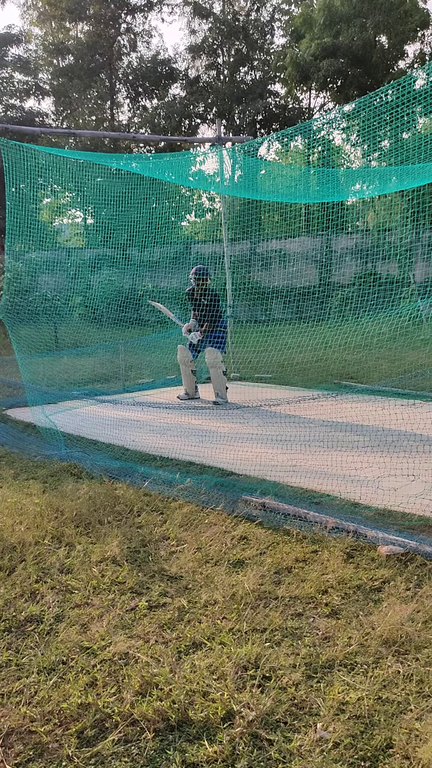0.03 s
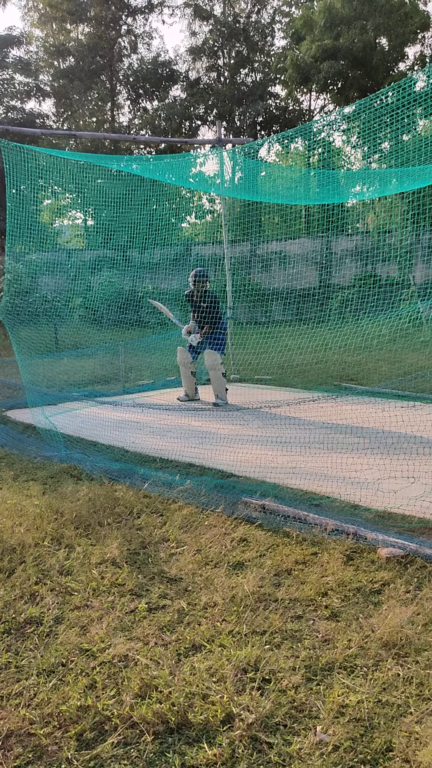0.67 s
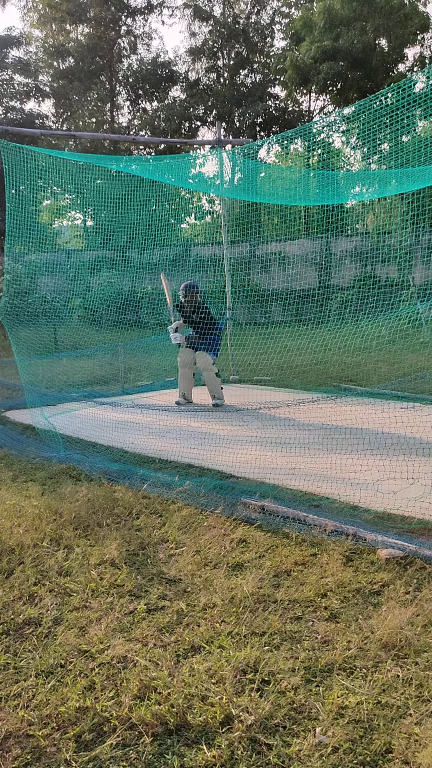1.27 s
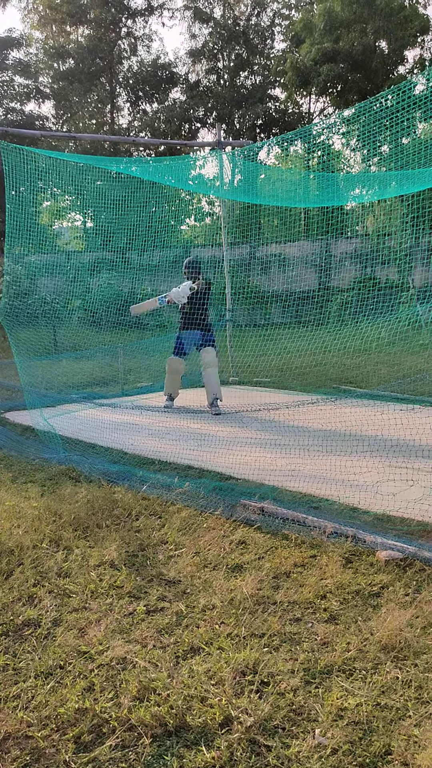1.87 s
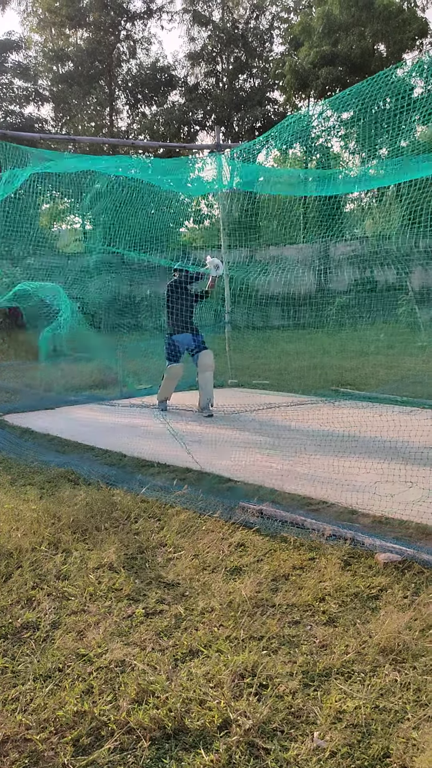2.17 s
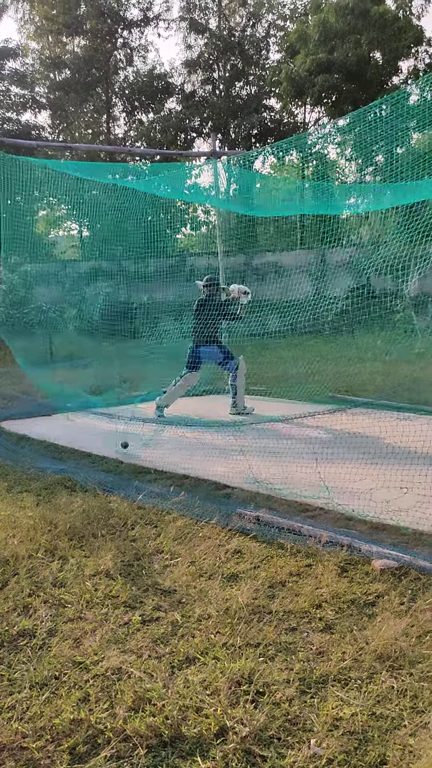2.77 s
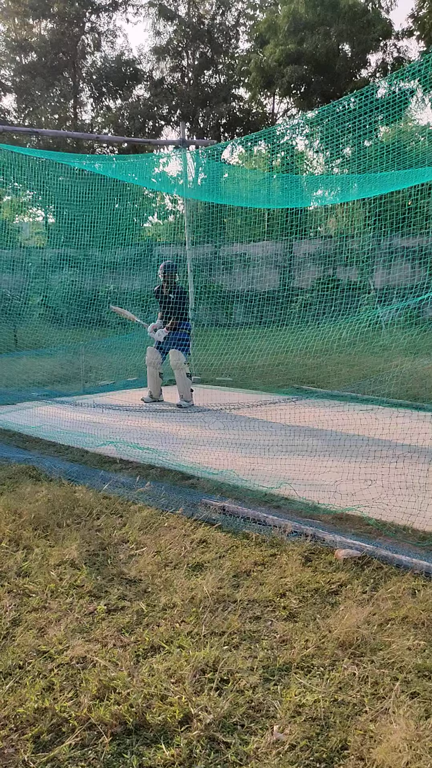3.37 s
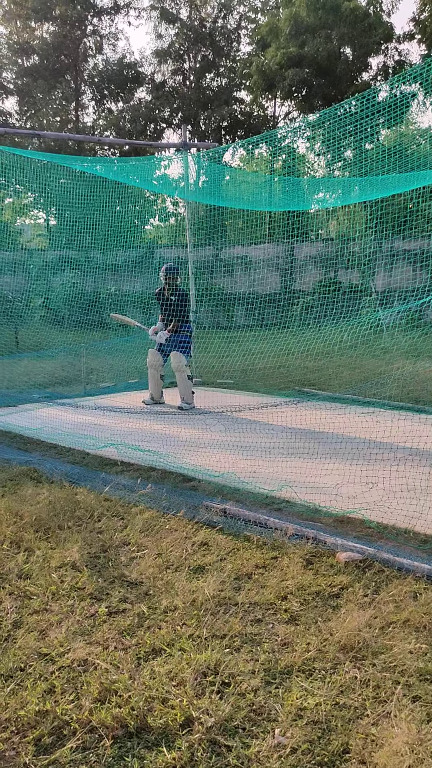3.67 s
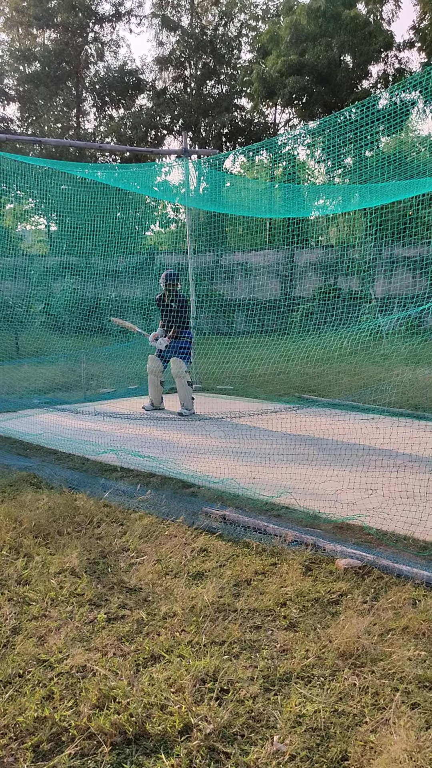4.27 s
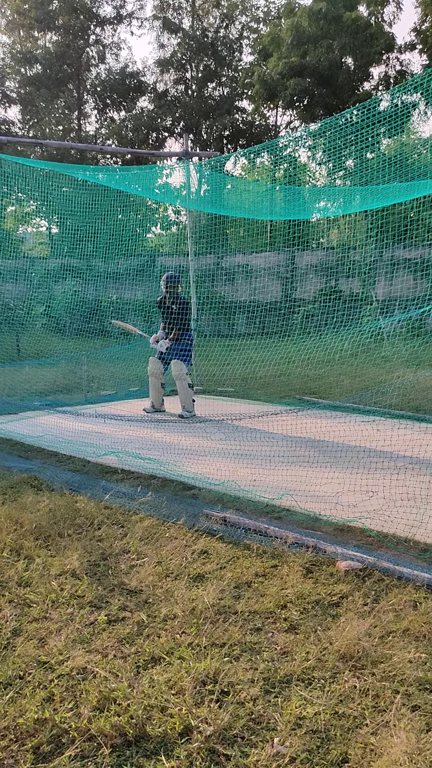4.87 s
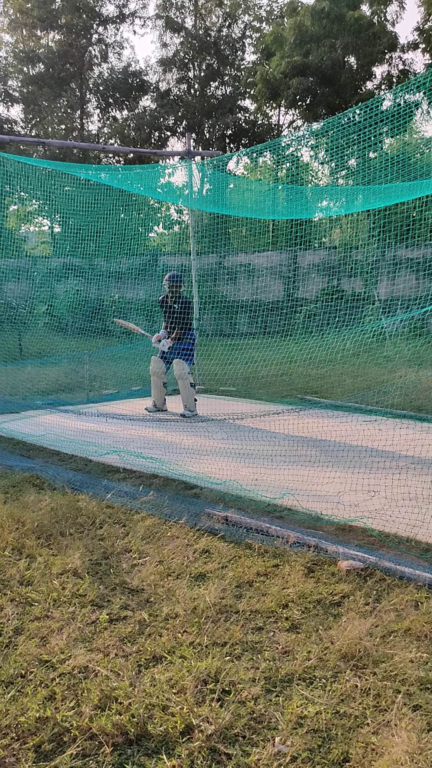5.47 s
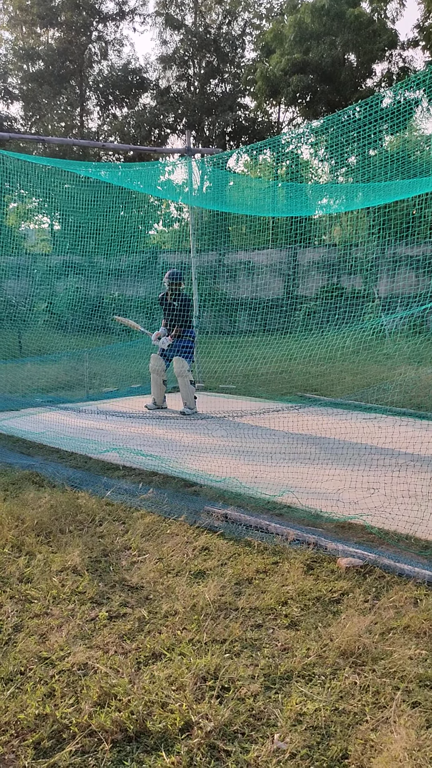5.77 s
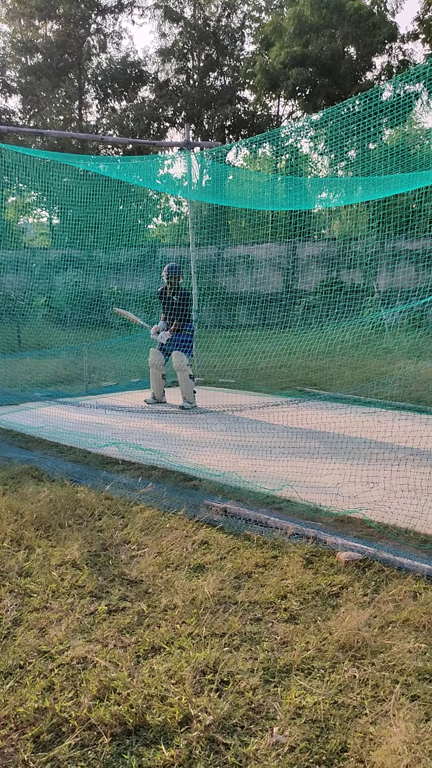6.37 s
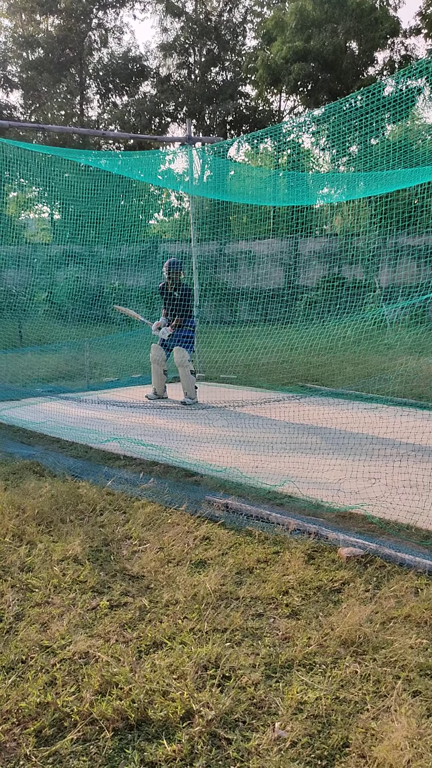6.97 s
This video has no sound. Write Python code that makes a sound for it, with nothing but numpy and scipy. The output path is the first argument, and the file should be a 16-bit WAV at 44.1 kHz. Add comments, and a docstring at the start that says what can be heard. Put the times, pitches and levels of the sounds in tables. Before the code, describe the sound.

At an outdoor practice net, shoes tap and scuff lightly and a ball bounces with a knock. A cricket bat strikes it with one sharp crack and a brief echo. The ball slaps the netting, which rustles, and a few soft thuds follow. The rest is quiet: a faint high insect buzz, a distant vehicle humming past and a few thin bird chirps, heard in stereo.

```python
"""A cricket bat meets the ball in an outdoor practice net: the impact excites damped modes, one sharp crack.
Walls and trees return it as echoes and diffuse reverberation. Shoes scuff by friction, the ball pitches,
then slaps the net, shakes its cords and drops with soft thuds.
Behind it, in calm air, a bush cricket buzzes by stridulation, a small bird chirps, a faint whistle
sounds and a distant vehicle drives by, humming at harmonics of its firing rate."""
import sys
import numpy as np
from scipy import signal
from scipy.fft import rfft, irfft, next_fast_len
from scipy.io import wavfile

SR = 44100
rng = np.random.default_rng(int(sys.argv[2]) if len(sys.argv) > 2 else 0)


def transcribe(u):
    """Save the signal u as a 16-bit wav file named by the first command-line argument.

    u: samples, shape (n,) or (channels, n), limited to [-1, 1]; the rate is SR.
    q: integer samples, one column per channel.
    """
    v = np.clip(np.atleast_2d(u).T, -1, 1)
    q = np.round(v * 32767).astype(np.int16)
    wavfile.write(sys.argv[1], SR, q)


N = 309582
T = np.arange(N) / SR
HZ = np.fft.rfftfreq(N, 1 / SR)
MS = 1e-3
EDGE_HZ = 7740
CRACK_S = 1.52429
ROAD_IN_S, ROAD_RISE_S = 2.76, 0.072


def amp(db):
    """Amplitude ratio of a level in decibels."""
    return 10 ** (np.asarray(db) / 20)


def unit(x):
    """Normalisation to rms 1."""
    return x / np.sqrt(np.mean(x ** 2) + 1e-20)


def read(points, hz):
    """Interpolation on a log-frequency axis."""
    f, value = np.transpose(points)
    return np.interp(np.log(hz + 1), np.log(f + 1), value)


def add(mix, s, sound):
    """Superposition: a sound joins the mix at time s."""
    part = mix[:, max(round(s * SR), 0):][:, :sound.shape[-1]]
    part += sound[..., :part.shape[1]]


def pan(lean_db):
    """Left and right gains for a level difference between the channels."""
    return amp([[lean_db / 2], [-lean_db / 2]])


def ramp(start_s, length_s):
    """Linear transition from 0 to 1."""
    return np.clip((T - start_s) / length_s, 0, 1)


def passing(nearest_s, span_s):
    """Spherical spreading: a source on a straight path is heard as one over distance."""
    return 1 / np.hypot(1, (T - nearest_s) / span_s)


def wander(rate_hz):
    """Random modulation: straight lines between Gaussian values."""
    knots = rng.standard_normal(8192)
    return np.interp(T * rate_hz * 2, np.arange(len(knots)), knots)


def band(hz, width_hz):
    """Narrow-band noise: a carrier with random amplitude and phase."""
    envelope = wander(width_hz) + 1j * wander(width_hz)
    carrier = np.exp(2j * np.pi * np.cumsum(hz * np.ones(N)) / SR)
    return unit((envelope * carrier).real)


# likeness of the two channels: (frequency [Hz], correlation [-1 to 1])
CORRELATION = [(60, 0.99), (120, 0.99), (250, 0.98), (500, 0.84), (1000, 0.65), (2020, 0.26), (4090, 0.02),
               (8270, -0.14)]
# imbalance at lean = 1: (frequency [Hz], left minus right [dB])
IMBALANCE = [(60, 0.5), (100, 1.0), (180, 1.5), (310, 1.0), (540, -0.5), (930, 2.5), (1600, 4.0),
             (2770, 4.5), (4780, 8.0), (8270, 2.5)]
def noise(spectrum, lean=0):
    """Partly coherent noise: the channels are alike in the bass and unrelated in the treble."""
    a, b = rfft(rng.standard_normal((2, N)))
    same = read(CORRELATION, HZ)
    channels = np.array([a, same * a + np.sqrt(1 - same ** 2) * b])
    balance = amp(lean * read(IMBALANCE, HZ) * np.array([[.5], [-.5]]))
    return unit(irfft(channels * balance * amp(read(spectrum, HZ)), N))


def hiss(size, centre_hz, octaves):
    """Random-phase stereo noise under a Gaussian hump in log frequency."""
    hz = np.fft.rfftfreq(size, 1 / SR)
    a, b = np.exp(2j * np.pi * rng.random((2, len(hz))))
    same = read(CORRELATION, hz)
    channels = np.array([a, same * a + np.sqrt(1 - same ** 2) * b])
    hump = np.exp(-.5 * (np.log2((hz + 1) / centre_hz) / octaves) ** 2) * (hz < EDGE_HZ)
    return unit(irfft(channels * hump, size))


def tick(centre_hz, decay_ms, octaves):
    """Noise transient with a fast attack and exponential decay."""
    t = T[:2048]
    return hiss(len(t), centre_hz, octaves) * np.exp(-t / (decay_ms * MS)) * (1 - np.exp(-t / 0.00034))


def ring(hz, rise_ms):
    """Heavily damped mode: it swells during contact, peaks at rise_ms and dies quickly."""
    t = T[:2048]
    u = t / (rise_ms * MS)
    return -u ** 2 * np.exp(2 - 2 * u) * np.sin(2 * np.pi * hz * t)


# outdoor background: (frequency [Hz], relative spectral density [dB])
AIR_SPECTRUM = [(13, -23.5), (25, 0), (80, -2.5), (160, -4.5), (260, -17), (430, -25), (560, -24.5),
                (680, -21), (870, -23), (1900, -24.5), (4200, -33), (5300, -28.5), (7050, -13.5),
                (7700, -21.5)]
def calm_air():
    """Ambient noise whose level drifts slightly."""
    return amp(-57.5 + 0.76 * wander(2.7)) * noise(AIR_SPECTRUM, lean=0.49)


def far_whistle(start_s=.2, end_s=.75):
    """Narrow-band noise, heard as a faint, thin whistle."""
    u = ramp(start_s, end_s - start_s)
    arch = 2 * np.sqrt(u * (1 - u))
    return amp(-83) * band(3400, width_hz=43) * arch


# traffic noise: (frequency [Hz], relative spectral density [dB])
ROAD_SPECTRUM = [(13, -19.5), (30, -1.5), (60, -5), (130, -16.5), (215, -14.5), (330, -20.5), (1050, -18.5),
                 (1450, -18.5), (1820, -18), (2700, -21), (4500, -25.5), (6100, -13.5), (7100, -15.5),
                 (7700, -22.5)]
def road():
    """Incoherent sources add in power: far traffic and one passing vehicle, towards the left."""
    roar = noise(ROAD_SPECTRUM, lean=.9)
    level = np.hypot(amp(-69), amp(-56) * passing(nearest_s=5.73, span_s=1))
    return ramp(ROAD_IN_S, ROAD_RISE_S) * level * amp(.5 * wander(6.1)) * roar


# engine speed, steady, stumbling, then slowing: (time [s], firing rate [Hz])
FIRING_RATE = [(5.4, 33.7), (5.62, 30.7), (5.8, 32.38), (7.02, 26.3)]
# harmonics, relative to the engine gain: (order [-], cruising [dB], pulling [dB], slowing [dB])
ENGINE_HARMONICS = [(1, -13.5, -11, -6), (2, -6, -14, -11), (3, -25, -20, -9), (4, -23, -16, -3),
                    (5, -3, -1, -4.5), (6, -3, -11, -11)]
# swell of the hum: (time [s], gain [dB])
ENGINE_GAIN = [(2.85, -67.5), (3.6, -61.5), (4.15, -63.5), (4.45, -58), (4.9, -59), (5.25, -62.5),
               (5.7, -59.5), (6.1, -62.5), (7.02, -63.5)]
def engine(pull_s=4.24, slow_s=5.3, change_s=0.16, gear_order=36.2):
    """Periodic firing gives harmonics that shift with load; the gears sing at a multiple of its rate."""
    firing_hz = np.interp(T, *np.transpose(FIRING_RATE))
    pull, slow = ramp(pull_s, change_s), ramp(slow_s, change_s)
    unsteady = 0.0036 * wander(5.0) + 0.014 * slow * wander(14)
    phase = 2 * np.pi * np.cumsum(firing_hz * (1 + unsteady)) / SR
    hum = np.zeros(N)
    for order, cruise_db, pull_db, slow_db in ENGINE_HARMONICS:
        order_db = cruise_db + (pull_db - cruise_db) * pull + (slow_db - pull_db) * slow
        hum += np.sqrt(2) * amp(order_db + 1.9 * wander(5.3)) * np.sin(order * phase)
    hum *= amp(np.interp(T, *np.transpose(ENGINE_GAIN)))
    gears = amp(-73.5) * passing(nearest_s=4.53, span_s=1.4) * band(gear_order * firing_hz, width_hz=90)
    return ramp(ROAD_IN_S, ROAD_RISE_S) * (hum + gears) * pan(1.4)


# far-off whine from the road: (frequency [Hz], level [dB])
WHINE_LINES = [(2891, -87.5), (3257, -78), (3639, -78)]
def road_whine():
    """Spectral lines broadened by random modulation: a thin, ragged whine at the end."""
    return sum(amp(db) * band(hz, width_hz=60) for hz, db in WHINE_LINES) * ramp(6.43, 0.028)


# bird calls: (time [s], duration [s], middle pitch [Hz], glide [Hz], level [dB])
BIRD_CHIRPS = [(5.364, 0.11, 4470, -200, -73), (5.622, 0.088, 4460, 150, -70), (5.815, .10, 4220, -40, -74),
               (6.305, 0.096, 4350, -300, -71), (6.719, 0.127, 4330, 60, -70)]
def bird(arch_hz=170):
    """Frequency modulation: thin whistles arch and glide in pitch, blurred by distance."""
    out, waver, flutter = np.zeros((2, N)), wander(80), amp(2.3 * wander(57))
    for s, length, middle_hz, glide_hz, db in BIRD_CHIRPS:
        u = np.linspace(-1, 1, round(length * SR))
        span = slice(round(s * SR), round(s * SR) + len(u))
        hz = (middle_hz + glide_hz * u / 2 - arch_hz * u ** 2) * (1 + .014 * waver[span])
        envelope = amp(db) * flutter[span] * np.sqrt(1 - u ** 2)
        add(out, s, envelope * np.sin(2 * np.pi * np.cumsum(hz) / SR))
    return out


# phrases that swell to a sudden stop: (start [s], stop [s], final gain [dB])
INSECT_PHRASES = [(0, 0.99, -63.5), (1.844, 2.542, -63), (2.812, 3.109, -60.5), (3.6, 4.491, -60),
                  (5.138, 5.884, -60), (6.645, 7.203, -61.5)]
def bush_cricket(tooth_hz=6950, fall_hz_per_s=110000, swell_db=28):
    """Stridulation: each wing stroke is a short falling note; the strokes slow before each stop."""
    level, stroke_hz = np.zeros(N), np.full(N, 140.5)
    for start, stop, last_db in INSECT_PHRASES:
        on = (T >= start) & (T < stop)
        level[on] = amp(last_db - swell_db * (stop - T[on]) ** 1.87)
        stroke_hz[on] -= 8 * np.exp((T[on] - stop) / 0.16)
    cycle = np.cumsum(stroke_hz) / SR % 1
    from_middle_s = (cycle - .5) / stroke_hz
    phase = 2 * np.pi * (tooth_hz - fall_hz_per_s * from_middle_s / 2) * from_middle_s
    note = np.cos(phase + .7 * wander(45))
    strokes = unit(note * np.sin(np.pi * cycle) ** 2 * amp(wander(60)))
    # foliage smears part of the song into a steady rasp
    rasp = noise([(5000, -42.5), (6400, -19), (6750, -10), (6950, -11.5), (7150, 0.5), (7500, -7),
                  (8000, -36)])
    return level * (.85 * strokes + .4 * rasp) * pan(-.5)


# rubbing of shoes, pads and bat: (time [s], duration [s], gain [dB], centre [Hz])
SCUFF_STROKES = [(0.528, 0.09, -65, 2200), (0.687, 0.11, -62, 1800), (0.825, 0.16, -66.5, 3480),
                 (1.04, 0.03, -59.5, 2800), (1.079, 0.23, -63, 2370), (1.124, 0.042, -48, 4240),
                 (1.251, 0.25, -56, 3218), (1.343, 0.096, -47, 3500), (1.468, 0.082, -52.5, 4830),
                 (2.714, 0.072, -61.5, 5100)]
# colour of the rubbing: (frequency [Hz], bandwidth [Hz], lift [dB])
SCUFF_RESONANCES = [(1700, 350, 5), (2520, 250, 8), (3350, 250, 4), (4040, 350, 6), (6080, 300, 5),
                    (7190, 300, 5)]
def scuffs():
    """Friction noise: lightly grained hiss swells and fades, filtered by a few resonances."""
    out, grain = np.zeros((2, N)), amp(1.6 * wander(200))
    for s, length, db, centre_hz in SCUFF_STROKES:
        stroke = hiss(32768, centre_hz, octaves=1.15)[:, :round(length * SR)]
        add(out, s, amp(db) * stroke * np.sin(np.linspace(0, np.pi, stroke.shape[1])))
    colour_db = sum(lift / (1 + (2 * (HZ - hz) / width) ** 2) for hz, width, lift in SCUFF_RESONANCES)
    return irfft(rfft(out * grain) * amp(colour_db - 5), N) * pan(2.5)


# shoes on the pitch: (time [s], level [dB], centre [Hz])
SHOE_TAPS = [(.5350, -50, 1300), (.5490, -47, 2200), (0.706, -45.5, 1900), (.7640, -52, 1000),
             (1.3310, -54, 1300)]
def shoe_taps():
    """Light impacts: a weak damped mode under a tick of noise."""
    out = np.zeros((2, N))
    for s, db, hz in SHOE_TAPS:
        add(out, s, amp(db) * (.55 * ring(560, .8) + tick(hz, 3, 1.1)))
    return out * pan(1.2)


# grit under a shoe: (time [s], level [dB], decay time [ms])
GRIT_CRUNCHES = [(1.126, -37.5, 0.85), (2.7262, -47.5, 6.5), (2.742, -47.5, 3.4)]
def grit():
    """Friction transients: grit crunches brightly under a turning shoe."""
    out = np.zeros((2, N))
    for s, db, decay_ms in GRIT_CRUNCHES:
        add(out, s, amp(db) * tick(8200, decay_ms, 0.85))
    return out * pan(2.1)


# feet and ball on mat and turf: (time [s], thud [dB], frequency [Hz], rise time [ms], grit [dB])
TURF_THUDS = [(0.044, -54, 420, 1.9, -61), (1.102, -45.5, 297, 1.8, -58), (1.1570, -31, 225, 1.7, -40.5),
              (1.199, -44, 180, 2.6, -54), (2.029, -43.5, 398.5, 1.9, -56), (2.4855, -47, 413, 2.16, -55.5)]
def turf_thuds():
    """Impacts on soft ground: a low damped mode and a tick of grit."""
    out = np.zeros((2, N))
    for s, thud_db, hz, rise_ms, grit_db in TURF_THUDS:
        add(out, s, amp(thud_db) * ring(hz, rise_ms) + amp(grit_db) * tick(950, 4.6, 1.1))
    return out * pan(.6)


# the ball on the ground: (time [s], thud [dB], rise time [ms], tick [dB])
BALL_BOUNCES = [(1.0801, -26.5, .7, -26), (2.3838, -39.5, 1.15, -38)]
def ball_bounces():
    """Two impacts, hard then soft: the softer contact builds more slowly."""
    out = np.zeros((2, N))
    for s, thud_db, rise_ms, tick_db in BALL_BOUNCES:
        add(out, s, amp(thud_db) * ring(444, rise_ms) + amp(tick_db) * tick(8300, 1.3, 1.86))
    return out * pan(1.5)


def net_shake(start_s=1.777, rise_s=0.024, still_s=2.04, fade_db_per_s=30, ticks_per_s=60):
    """Damped motion: the mesh rustles and settles while its cords tick as a Poisson process."""
    age = np.maximum(T - start_s, 0)
    settle = np.clip((still_s - T) / .04, 0, 1)
    shake = ramp(start_s, rise_s) * amp(-fade_db_per_s * age) * settle
    cords = (rng.random(N) < ticks_per_s / SR) * rng.uniform(.3, 1, N) * shake
    rattle = signal.oaconvolve(cords[None], tick(1900, 1.8, .7), axes=1)[:, :N]
    rustle = hiss(next_fast_len(N), 2600, octaves=2.6)[:, :N] * shake
    return (amp(-42) * rattle + amp(-59.5) * rustle) * pan(2.5)


# the ball in the net: (time [s], thud [dB], frequency [Hz], snap [dB], snap centre [Hz])
NET_SLAPS = [(1.556, -20.5, 944, -22.5, 1394), (1.7732, -33, 1910, -41.5, 3150),
             (1.807, -49, 1680, -36, 2180)]
def net_slaps(rise_cycles=0.39):
    """Impulsive loading: the ball slaps the mesh and the cords snap taut."""
    out = np.zeros((2, N))
    for s, thud_db, hz, snap_db, snap_hz in NET_SLAPS:
        thud = ring(hz, rise_cycles / hz / MS)
        add(out, s, amp(thud_db) * thud + amp(snap_db) * tick(snap_hz, 3.7, .8))
    return out * pan(4.5)


def with_tail(sound, t60=0.22):
    """Reverberation by convolution: the surroundings add a faint, decaying tail."""
    tail = hiss(16384, 1510, octaves=3.2) * amp(-60 * T[:16384] / t60)
    tail /= np.linalg.norm(tail[0])
    return sound + amp(-17.5) * signal.fftconvolve(sound, tail, axes=1)[:, :N]


# crack scattered from near and far: (frequency [Hz], relative spectral density [dB])
NEAR_SPECTRUM = [(100, -17.5), (400, -26), (800, 2.5), (1500, -10.5), (2600, -4.5), (4000, -4.5),
                 (5200, -5), (6400, 3.5), (7600, 2)]
FAR_SPECTRUM = [(100, -22.5), (480, -16), (800, 0.5), (1300, -4.5), (2500, -8.5), (4000, -18), (6500, -9.5),
                (7600, -10)]
def scatter(spectrum, db, t60, rise_s, lean_db):
    """Diffuse reflection: countless small echoes of the crack arrive in clumps and decay."""
    age = np.maximum(T - CRACK_S, 0)
    clumps_db = 2.2 * wander(90)
    build_up = 1 - np.exp(-(age / rise_s) ** 2)
    decay = amp(db - 60 * age / t60 + clumps_db)
    return noise(spectrum) * build_up * decay * pan(lean_db)


# modes of bat and ball: (frequency [Hz], rise time [ms], left level [dB], right level [dB])
BAT_MODES = [(257, 3.6, -25.7, -28.2), (742, 2.14, -40.0, -11.0), (856, 1.51, -4.9, -12.0),
             (1516, 2.36, -27.7, -27.4), (1855, 3.6, -32.1, -36.9), (2542, 1.18, -25.7, -25.9),
             (2926, 0.98, -25.7, -25.0), (4119, 2.08, -24.2, -30.9), (4877, 1.5, -21.8, -28.7),
             (5936, 1.22, -15.6, -23.9), (6515, 1.37, -15.6, -36.0), (7173, 0.35, -8.1, -4.2),
             (7494, 3.6, -32.6, -28.9)]
# echoes from pitch, walls and trees: (delay [s], gain [dB], low-pass cutoff [Hz])
REFLECTIONS = [(.0033, -17, 801.5), (0.0222, -35, 2500), (.0700, -29, 2830), (.0820, -41.5, 4000),
               (0.0876, -21, 1490), (.1210, -31, 2200), (0.1434, -26.5, 1300)]
def bat_crack(ground_dip_hz=455, right_leads_ms=.114):
    """Modal superposition: the blow rings bat and ball, and duller echoes follow."""
    modes = sum(amp([[left], [right]]) * ring(hz, rise_ms) for hz, rise_ms, left, right in BAT_MODES)
    # the reflection off the grass cancels one low band
    blow = signal.lfilter(*signal.iirnotch(ground_dip_hz, Q=3.5, fs=SR), modes)
    out = np.zeros((2, N))
    add(out, CRACK_S, blow)
    for delay, db, cutoff_hz in REFLECTIONS:
        echo = signal.lfilter(*signal.butter(1, cutoff_hz, fs=SR), blow)
        add(out, CRACK_S + delay, amp(db) * echo)
    out[1] = np.roll(out[1], -round(right_leads_ms * MS * SR))
    return out


def scene():
    """Superposition of the stroke, the movement around it and the background."""
    near = scatter(NEAR_SPECTRUM, db=-26.5, t60=0.48, rise_s=.009, lean_db=3.5)
    far = scatter(FAR_SPECTRUM, db=-42.5, t60=1.4, rise_s=0.044, lean_db=2.0)
    knocks = ball_bounces() + turf_thuds() + shoe_taps() + net_slaps() + grit()
    movement = with_tail(knocks) + net_shake() + scuffs()
    background = calm_air() + road() + engine() + road_whine() + bush_cricket() + bird() + far_whistle()
    return bat_crack() + near + far + movement + background


def record(dry):
    """Band limiting: a steep low-pass filter removes the top treble."""
    low_pass = signal.firwin(301, EDGE_HZ, window=("kaiser", 7), fs=SR)
    return signal.oaconvolve(dry, low_pass[None], "same")


dry = scene()
out = record(dry)
transcribe(out)
```